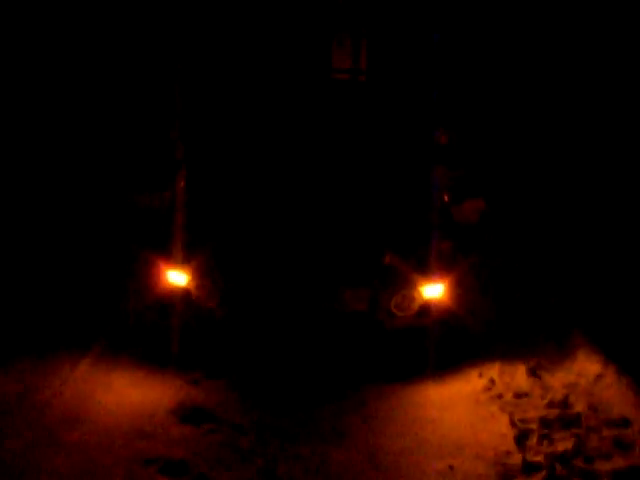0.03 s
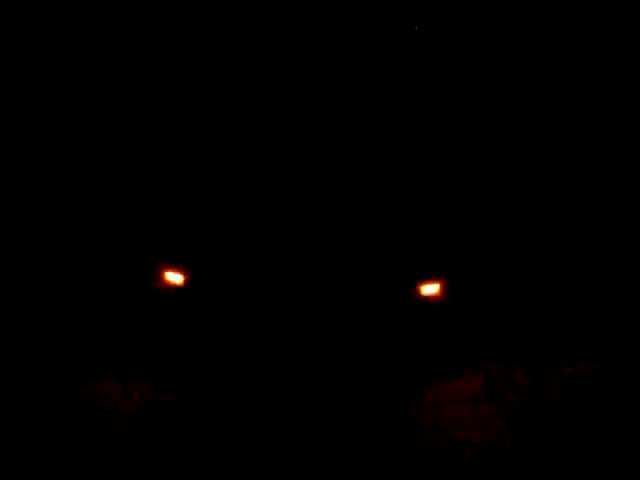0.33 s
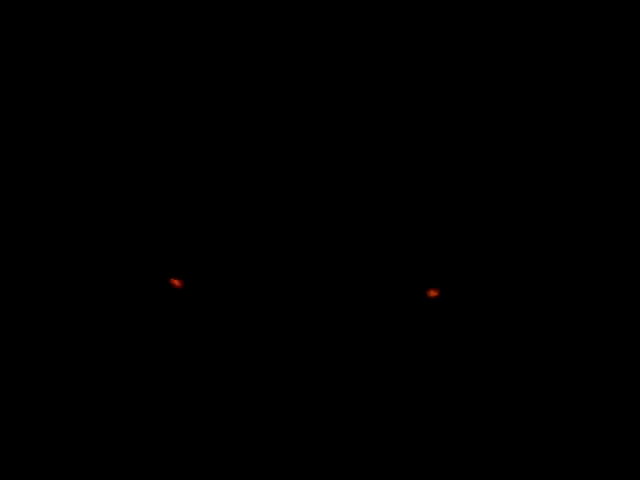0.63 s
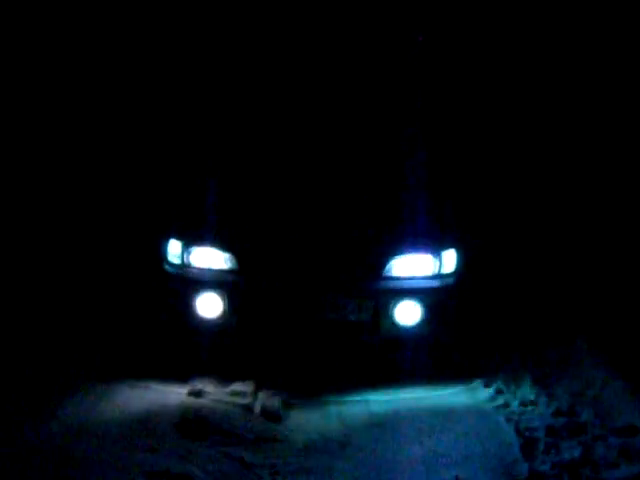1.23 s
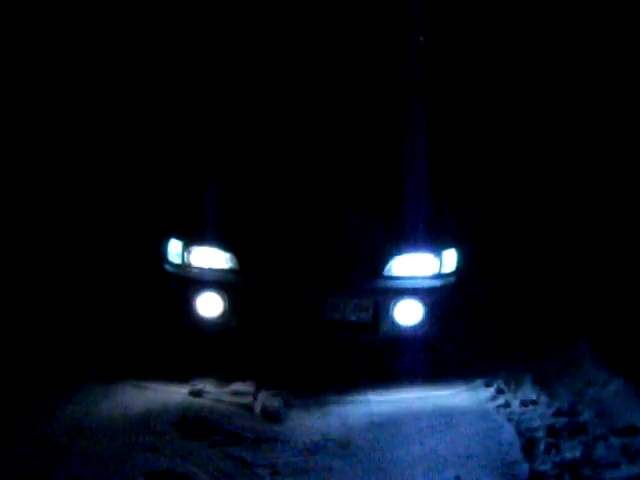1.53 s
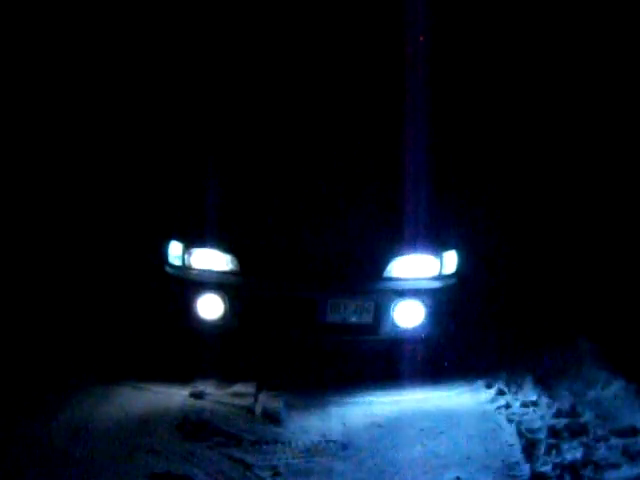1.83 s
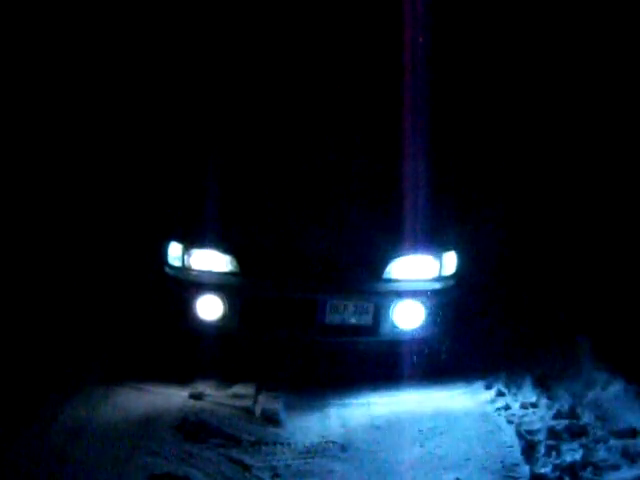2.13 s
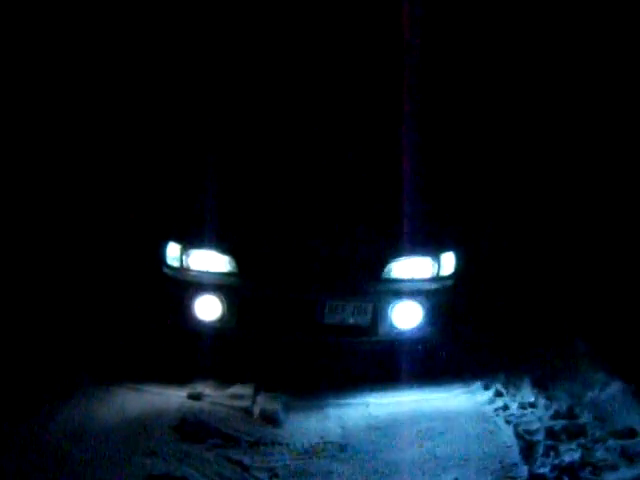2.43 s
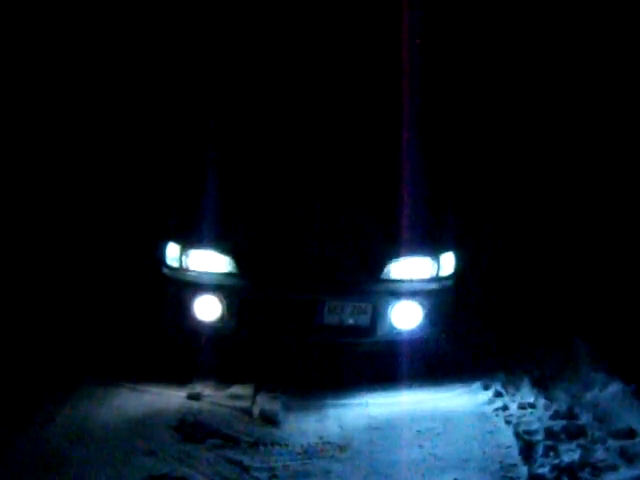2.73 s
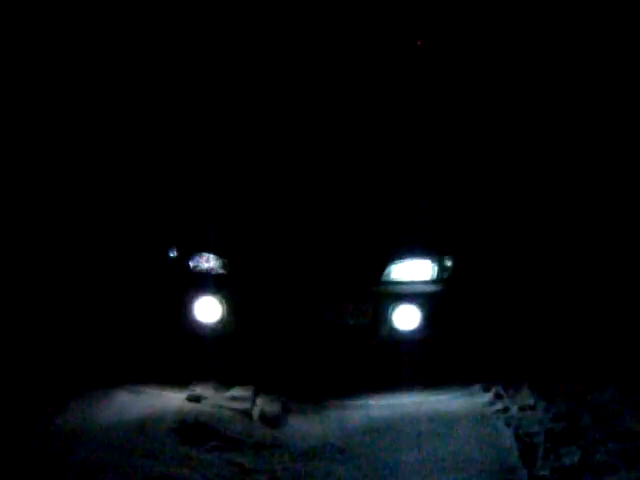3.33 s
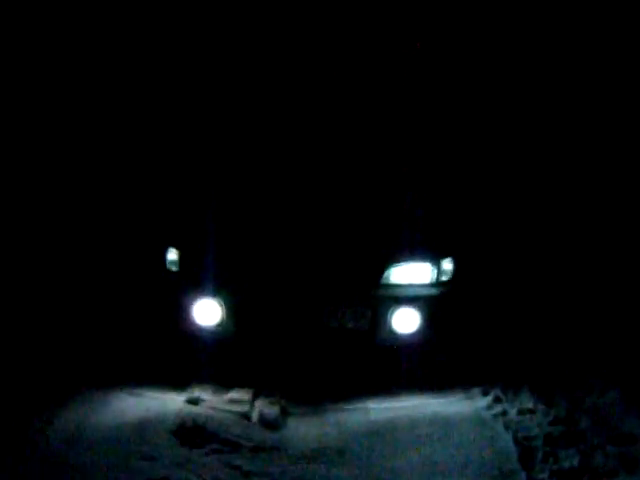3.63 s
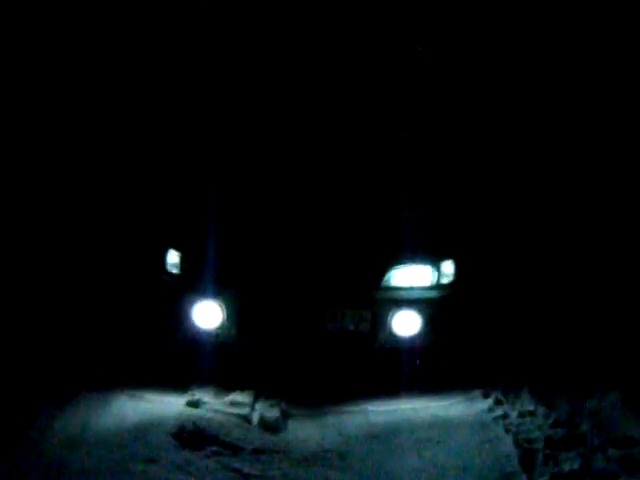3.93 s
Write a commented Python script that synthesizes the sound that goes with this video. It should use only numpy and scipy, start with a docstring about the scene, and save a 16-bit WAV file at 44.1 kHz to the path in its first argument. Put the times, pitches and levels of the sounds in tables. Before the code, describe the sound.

A cold car engine is cranked outdoors, heard through a small, hissy microphone with soft thumps. A brief rustle and dull knocks lead to a faint pump hum, before the starter engages and turns with metallic clatter and squeaks.

```python
"""Outdoors at night, beside a cold car. After a short rustle and a few small knocks, a small motor,
probably the fuel pump, hums faintly. Then the starter engages with a clunk and cranks the engine:
its gear teeth click and scrape, ringing the housing and rattling the covers, slowing and straining
at each compression. Soft low thumps and a steady hiss sit in the small microphone throughout."""
import sys
import numpy as np
from scipy import signal
from scipy.fft import rfft, irfft
from scipy.io import wavfile

SR = 44100
rng = np.random.default_rng(int(sys.argv[2]) if len(sys.argv) > 2 else 0)


def to_wav(sig):
    """Store sig (one row per channel, or 1-D mono) as 16-bit WAV at the path in sys.argv[1].

    Samples outside -1..1 are clipped; the rate is SR.
    """
    pcm = np.clip(np.atleast_2d(sig), -1, 1) * 32767
    pcm = np.round(pcm).astype(np.int16)
    wavfile.write(sys.argv[1], SR, pcm.T)  # frames by channels


N = 176400
T = np.arange(N) / SR
CRANK_START_S = 3.022
CRANKING = T > CRANK_START_S

# soft noise colour of the hiss and the scuffs: (frequency [Hz], relative level [dB])
HISS_COLOUR = [(100, -13.5), (330, -0.5), (1700, -11.5), (3900, -15), (7450, -16), (7900, -21.5),
               (8500, -31.5), (8900, -72)]


def amp(db):
    """Decibels to gain."""
    return 10 ** (np.asarray(db) / 20)


def unit(x):
    """Scales to rms 1."""
    return x / np.sqrt(np.mean(x ** 2) + 1e-20)


def while_cranking(x):
    """Silent until the starter runs, rms 1 from then on."""
    return x / np.sqrt(np.mean(x[CRANKING] ** 2)) * CRANKING


def curve(table, column=1):
    """One column of a time table at every sample."""
    rows = np.array(table)
    return np.interp(T, rows[:, 0], rows[:, column])


def noise():
    """White noise."""
    return rng.standard_normal(N)


def butter(order, hz, kind="low"):
    """A smooth low-pass or high-pass filter."""
    return signal.butter(order, hz, kind, fs=SR, output="sos")


def wander(rate_hz):
    """Random drift up to about the given rate, rms 1."""
    return unit(signal.sosfilt(butter(2, rate_hz), noise()))


def colour(x, points):
    """Shapes x with an EQ curve of (frequency [Hz], level [dB]), at rms 1."""
    hz, db = np.transpose(points)
    f = np.fft.rfftfreq(N, 1 / SR)
    gain = amp(np.interp(np.log(f + 1), np.log(hz + 1), db))
    return unit(irfft(rfft(x) * gain, N))


def ring(x, hz, width):
    """One resonance, at rms 1."""
    r = np.exp(-np.pi * width / SR)
    return unit(signal.lfilter([1, 0, -1], [1, -2 * r * np.cos(2 * np.pi * hz / SR), r * r], x))


def resonate(x, modes):
    """A metal part rings in all its modes when x drives it."""
    return sum(amp(db) * ring(x, hz, width) for hz, width, db in modes)


def dull_noise(hz):
    """A broad noise band around hz, at rms 1."""
    return ring(ring(noise(), hz, 2 * hz), hz, 2 * hz)


def swell(centre, half):
    """A bell-shaped envelope."""
    return np.exp(-((T - centre) / half) ** 2)


def blow(start, decay):
    """A sudden envelope that dies away."""
    return np.clip((T - start) * SR / 20, 0, 1) * np.exp(-np.maximum(T - start, 0) / decay)


def background():
    """A bed of steady hiss over a low rumble."""
    # rumble colour: (frequency [Hz], relative level [dB])
    rumble = [(30, 9.5), (70, 4), (150, -4.5), (230, -2.5), (400, -58)]
    return amp(-55) * colour(noise(), HISS_COLOUR) + amp(-52) * colour(noise(), rumble)


def thumps(length_s=0.00956):
    """Low thumps in the microphone: brief square dips with rounded edges that rebound slowly."""
    # thump onsets: (time [s])
    onsets = [0.041, 0.312, 0.517, 0.613, 0.708, 0.806, 1.04, 1.377, 1.485, 1.522, 1.565, 1.638, 1.764,
              1.899, 1.988, 2.11, 2.204, 2.263, 2.362, 2.439, 2.529, 2.601, 2.657, 2.738, 2.795, 2.856,
              2.942, 3.027, 3.099, 3.162, 3.229, 3.297, 3.424, 3.495, 3.573, 3.656, 3.738, 3.8, 3.909]
    dips = sum(1.0 * ((T > s) & (T < s + length_s)) for s in onsets)
    rounded = signal.sosfiltfilt(butter(1, 400), dips)
    return -amp(-33) * signal.sosfilt(butter(1, 13, "high"), rounded)


def rustle():
    """A short grainy rustle, then two faint scuffs."""
    # rustle colour: (frequency [Hz], relative level [dB])
    tone = [(100, -9), (300, 1), (1540, -4), (2340, -14), (3370, -7.5), (5500, -36)]
    # rustle envelope: (time [s], level [dB])
    fade = [(0, -52), (.08, -48.5), (.2, -49), (.34, -55), (.42, -66), (.6, -68)]
    # scuffs: (start [s], decay [s], centre [Hz], level [dB])
    scuffs = [(1.075, 0.033, 1600, -52.5), (1.205, 0.019, 4500, -52.5)]
    grains = noise() * amp(2.0 * wander(270))
    out = colour(grains, tone) * amp(curve(fade))
    for s, decay, hz, db in scuffs:
        out += amp(db) * blow(s, decay) * ring(colour(noise(), HISS_COLOUR), hz, hz)
    return out


def knocks(grit=0.46):
    """Small dull knocks, each a damped tone roughened with noise."""
    # knocks: (time [s], level [dB], pitch [Hz], decay [s])
    hits = [(.072, -34, 460, 0.0034), (.0885, -35.5, 475, 0.0035), (0.0965, -25, 280, 0.0032),
            (.208, -29, 666, 0.0016), (.286, -37.5, 945, 0.0013), (0.355, -32.5, 317, 0.0031),
            (.515, -39, 300, 0.003), (0.809, -38.5, 151, 0.0074), (2.114, -37, 200, 0.0072),
            (2.37, -38, 160, 0.0079)]
    out = np.zeros(N)
    for s, db, hz, decay in hits:
        body = np.sqrt(2) * np.sin(2 * np.pi * hz * (T - s)) + grit * dull_noise(hz)
        contact = np.clip(2 * hz * (T - s), 0, 1)  # builds over half a cycle
        out += amp(db) * contact * blow(s, decay) * body
    return out


def ticks():
    """Light ticks: tiny bursts of bright noise."""
    # ticks: (time [s], level [dB])
    hits = [(.016, -45), (0.331, -46), (0.412, -41.5), (0.512, -47.5)]
    # tick colour: (frequency [Hz], relative level [dB])
    tone = [(1400, -35), (2200, 3), (3350, 6), (3900, -34)]
    return colour(noise(), tone) * sum(amp(db) * blow(s, decay=0.0038) for s, db in hits)


def pump(whine_order=15):
    """A small motor spins up with a hum, a thin whine and a low wash, and fades as the starter runs."""
    # motor run: (time [s], rotation rate [Hz], hum level [dB])
    run = [(1.48, 71.6, -108), (1.62, 96.5, -57), (2.4, 94, -56), (3.0, 96, -57)]
    # wash colour: (frequency [Hz], relative level [dB])
    wash_tone = [(40, -15.5), (110, 4), (160, -0.5), (260, -10), (1500, -45.5)]
    turns = np.cumsum(curve(run) * (1 + 0.0049 * wander(16.5))) / SR
    hum = unit(np.sin(2 * np.pi * turns)) * amp(2.5 * wander(14))
    whine = unit(np.sin(2 * np.pi * whine_order * turns)) * amp(1.7 * wander(6.7)) * swell(1.93, 0.47)
    wash = colour(noise(), wash_tone)
    fade = (T > run[0][0]) * np.exp(-np.maximum(T - run[-1][0], 0) / 0.6)
    return fade * amp(curve(run, column=2)) * (hum + amp(-11.5) * whine + amp(5.5) * wash)


def squeaks():
    """The turning engine gives short, unsteady high squeaks."""
    # squeaks: (centre [s], half length [s], pitch [Hz], level [dB])
    chirps = [(3.102, 0.012, 3236, -34.5), (3.135, 0.0082, 4960, -46), (3.302, 0.0084, 3200, -36),
              (3.299, 0.0067, 5070, -44), (3.337, 0.0085, 4930, -45.5), (3.48, 0.013, 6650, -45),
              (3.526, 0.0041, 6520, -43), (3.571, 0.0099, 3230, -32.5), (3.643, .008, 6000, -44),
              (3.741, .009, 3210, -36.5), (3.804, 0.0094, 3203, -34), (3.986, 0.012, 3220, -37.5)]
    drift = 1 + 0.0191 * wander(300)
    return sum(amp(db) * swell(s, half) * unit(np.sin(2 * np.pi * np.cumsum(hz * drift) / SR))
               for s, half, hz, db in chirps)


def clunk():
    """A dull, low jolt as the pinion slams into the ring gear."""
    return amp(-34.5) * swell(3.103, 0.016) * dull_noise(hz=260)


def metal_ring():
    """A thin metallic ringing swells out of the starter three times."""
    # high resonances: (frequency [Hz], width [Hz], relative level [dB])
    modes = [(7585, 40, 0), (8430, 40, -9)]
    # swells: (centre [s], half length [s], level [dB])
    swells = [(3.44, 0.032, -53), (3.705, 0.047, -61), (3.899, 0.036, -53.5)]
    return unit(resonate(noise(), modes)) * sum(amp(db) * swell(s, half) for s, half, db in swells)


def engine_bay(x, decay_s=0.012, wet=0.91):
    """Dense early reflections inside the engine bay smear each click."""
    t = np.arange(SR // 16) / SR
    tail = rng.standard_normal(len(t)) * np.exp(-t / decay_s)
    reflections = signal.fftconvolve(x, tail / np.linalg.norm(tail))[:N]
    return np.sqrt(1 - wet) * x + np.sqrt(wet) * reflections


def tooth_hits(teeth, spread_db=2.5, scrape_share=0.9, scrape_periods=0.8):
    """Each gear tooth lands with an uneven click and a short scrape."""
    tooth = teeth.astype(int)
    strength = amp(spread_db * np.clip(rng.standard_normal(4000), -2, 1))[tooth % 4000]
    clicks = np.diff(tooth, prepend=0) * strength
    scrape = noise() * strength * np.exp(-(teeth % 1) / scrape_periods)
    return (1 - scrape_share) * unit(clicks) + scrape_share * unit(scrape)


def brush_hiss(hits):
    """The motor's brushes hiss, with some grain from the gear teeth."""
    # brush colour: (frequency [Hz], relative level [dB])
    tone = [(2000, 10), (4000, 5.5), (4400, 6), (4700, -15.5), (5050, 3.5), (6400, 4.5), (7600, 2),
            (7900, -33.5)]
    return while_cranking(colour(noise() + 0.44 * hits, tone))


def cover_rattle(hits):
    """Thin engine parts ring and rattle along with the teeth."""
    # cover resonances: (frequency [Hz], width [Hz], relative level [dB])
    modes = [(1724, 13, -3.5), (2083, 10, -3), (2785, 8, -5.5), (2966, 25, 0.5), (3170, 75, -2)]
    # bright rattle colour: (frequency [Hz], relative level [dB])
    tone = [(900, -17.5), (1500, 2), (2000, 10), (2350, -20), (2900, -9), (3300, 5.5), (4100, -1.5),
            (4700, -51)]
    rattle = colour(engine_bay(hits), tone)
    return amp(-8) * while_cranking(resonate(hits, modes)) + amp(-2.5) * while_cranking(rattle)


def gear_clatter(hits):
    """The teeth ring the engine block and bell housing over a broad clatter."""
    # block and housing resonances: (frequency [Hz], width [Hz], relative level [dB])
    modes = [(676, 23, -3), (786.3, 17, 7), (868, 26, 1), (1024, 18, -10), (1093, 54, -6), (1437, 35, -10)]
    # clatter colour: (frequency [Hz], relative level [dB])
    tone = [(60, -28), (150, 6), (290, -10.5), (560, -3), (750, 4), (1200, -0.5), (1600, -10.5),
            (2500, -58)]
    housing = signal.sosfilt(butter(4, 560, "high"), resonate(hits, modes))
    clatter = colour(engine_bay(hits), tone)
    return amp(-5.5) * while_cranking(housing) + amp(-4.5) * while_cranking(clatter)


def gear_whine(teeth, tooth_hz, sing_order=5, resonance_hz=1124, half_width_hz=55):
    """Overtones of tooth pairs flutter; one gear overtone sings as it passes a resonance."""
    whine = sum(np.sin(np.pi * k * teeth) * amp(3 * wander(40)) for k in range(7, 10))
    detuning = (sing_order * tooth_hz - resonance_hz) / half_width_hz
    sing = while_cranking(np.sin(2 * np.pi * sing_order * teeth)) / np.hypot(1, detuning)
    return amp(-7.5) * while_cranking(whine) + amp(-6) * sing


def gear_groan(teeth):
    """At the top of a compression the gear groans on its tooth rate and the octave above."""
    # groans: (centre [s], half length [s], level [dB])
    swells = [(3.498, 0.021, -42.5), (3.763, 0.052, -42.5)]
    tone = unit(np.sin(4 * np.pi * teeth) + 0.53 * np.sin(2 * np.pi * teeth))
    return tone * amp(1.7 * wander(55)) * sum(amp(db) * swell(s, half) for s, half, db in swells)


def strain(start, rise, end, release):
    """Load builds, holds, and lets go as the piston passes the top."""
    return np.clip((T - start) / rise, 0, 1) * np.exp(-np.maximum(T - end, 0) / release)


def starter(jitter=0.012, spin_up_s=0.047):
    """The starter bites and cranks: each compression slows the gear and lifts it above its free whirr."""
    # gear speed, sagging at each compression: (time [s], tooth rate [Hz])
    speed = [(3.02, 139.6), (3.12, 159.9), (3.2, 226.3), (3.27, 198), (3.34, 225.4), (3.43, 221),
             (3.5, 196.7), (3.55, 199.9), (3.64, 249.3), (3.69, 232.4), (3.77, 190.6), (3.87, 238.3),
             (3.95, 223), (4.0, 197)]
    # the bite, then one strain per compression:
    # (start [s], rise [s], end [s], release [s], gear drive [dB], rattle drive [dB])
    strokes = [(3.022, 0.011, 3.03, 0.016, -31.5, -33), (3.065, 0.026, 3.076, 0.039, -29, -34),
               (3.108, 0.095, 3.275, 0.024, -33, -55.5), (3.314, 0.073, 3.53, 0.036, -30, -47),
               (3.627, 0.0045, 3.78, 0.011, -30.5, -43), (3.868, 0.0054, 4.21, .02, -31.5, -43)]
    tooth_hz = curve(speed)
    teeth = np.cumsum(tooth_hz * CRANKING * (1 + jitter * wander(40))) / SR  # teeth passed so far
    load = sum(amp(db) * strain(*timing) for *timing, db, _ in strokes)
    shake = sum(amp(db) * strain(*timing) for *timing, _, db in strokes) * amp(0.83 * wander(22))
    spin = np.clip((T - CRANK_START_S) / spin_up_s, 0, 1)  # fades in the unloaded whirr
    gear_hits, cover_hits = tooth_hits(teeth) * CRANKING, tooth_hits(teeth) * CRANKING
    gear = gear_clatter(gear_hits) * np.hypot(load, spin * amp(-40))
    rattle = cover_rattle(cover_hits) * np.hypot(shake, spin * amp(-41.5))
    brushes = brush_hiss(cover_hits) * (spin * amp(-44) + shake * amp(-2.5))
    return gear + rattle + brushes + metal_ring() + gear_whine(teeth, tooth_hz) * load + gear_groan(teeth)


def scene():
    """All sources mixed in mono."""
    car = starter() + clunk() + squeaks() + pump()
    return (car + rustle() + knocks() + ticks() + thumps() + background())[None]


def record(dry, notch_hz=4710, notch_width_hz=390, notch_db=-4.5, cutoff_hz=8950):
    """The small microphone has a shallow notch in the treble and a steep cut above it."""
    f = np.fft.rfftfreq(N, 1 / SR)
    notch = amp(notch_db * np.exp(-((f - notch_hz) / notch_width_hz) ** 2))
    heard = irfft(rfft(dry) * notch, N)
    high_cut = signal.firwin(401, cutoff_hz, window=("kaiser", 9), fs=SR)
    return signal.oaconvolve(heard, high_cut[None], "same")


dry = scene()
out = record(dry)
to_wav(out)
```